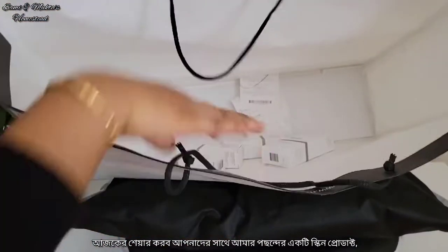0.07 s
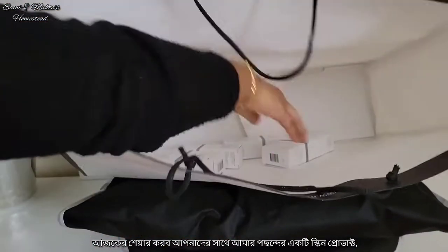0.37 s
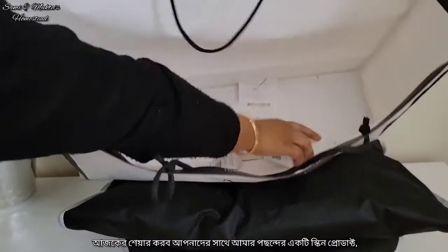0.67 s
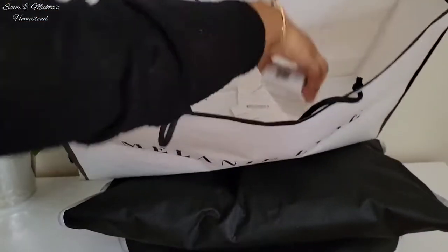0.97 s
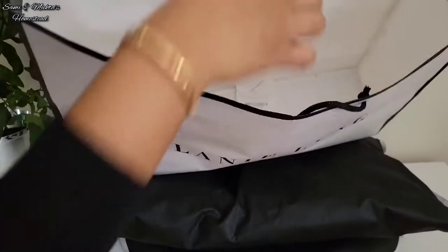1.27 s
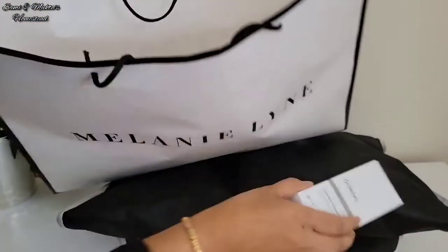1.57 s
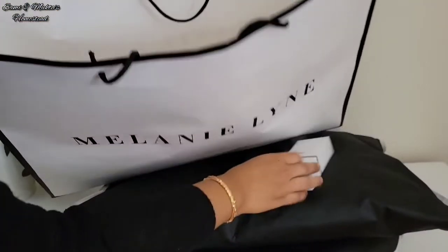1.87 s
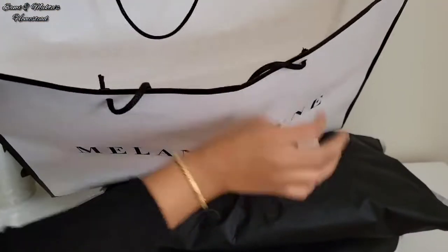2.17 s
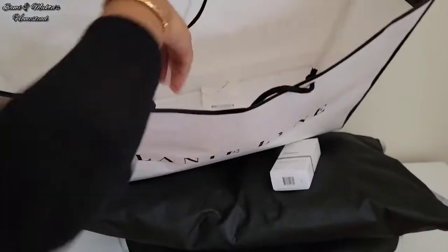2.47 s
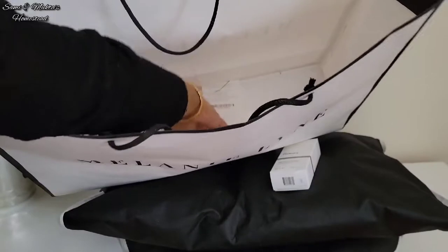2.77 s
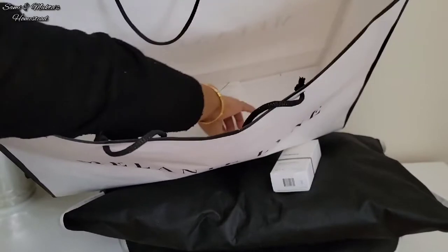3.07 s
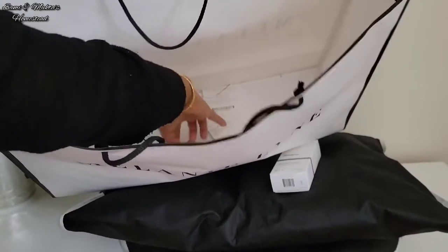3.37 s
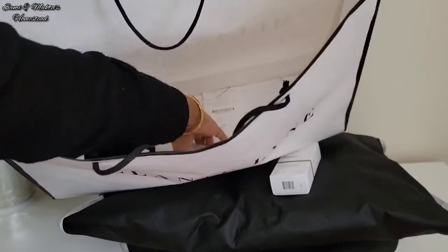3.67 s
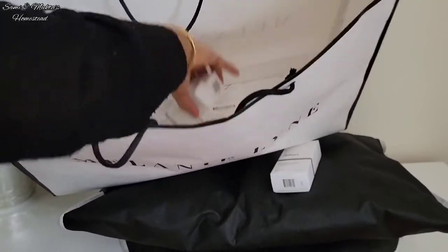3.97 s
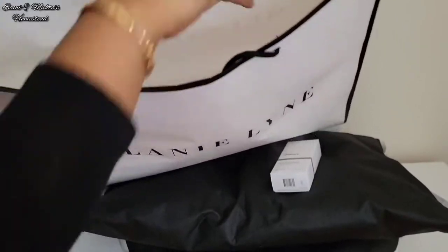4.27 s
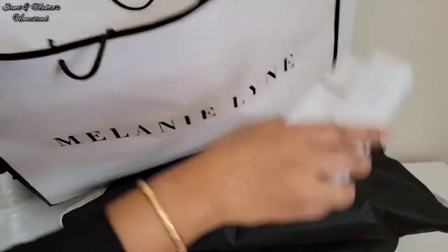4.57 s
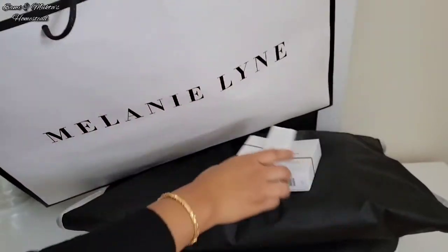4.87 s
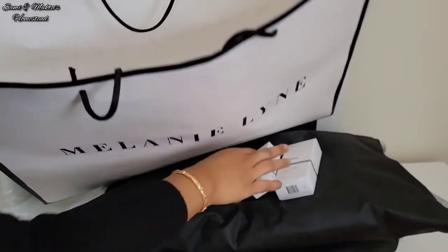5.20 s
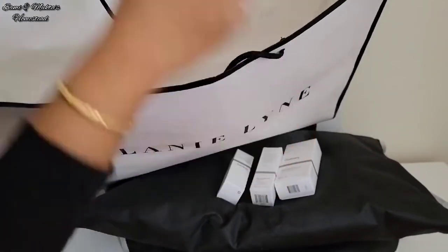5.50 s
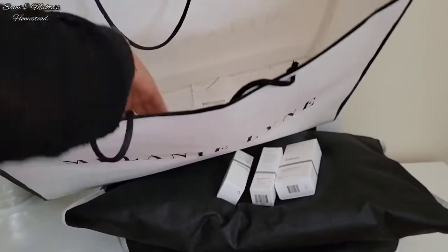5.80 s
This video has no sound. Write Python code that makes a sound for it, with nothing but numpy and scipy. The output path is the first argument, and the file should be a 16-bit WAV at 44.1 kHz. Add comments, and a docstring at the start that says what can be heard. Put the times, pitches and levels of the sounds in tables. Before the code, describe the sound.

A hand rummages in a big, stiff paper shopping bag, which crackles in short bursts while its walls flap with a soft, low boom. A sleeve rubs the rim and small cardboard boxes knock hollowly as they are gripped and set down. After a brief lull, a second, louder round of rustling and knocking follows, then thins out. It is heard close up in stereo, in a small, faintly humming room.

```python
"""A big, stiff paper shopping bag crackles as a hand reaches in twice and takes out small cardboard boxes.
The paper buckles in bursts of tiny snaps, and the boxes knock hollowly as they are bumped, gripped
and set on a cushion. The wide bag walls flap with a low boom, a sleeve rubs over the rim and a box edge
scrapes the paper. The small room hums. It is all heard close up, through a left and a right microphone."""
import sys
import numpy as np
from scipy import signal
from scipy.fft import rfft, irfft
from scipy.io import wavfile

SR = 44100
rng = np.random.default_rng(int(sys.argv[2]) if len(sys.argv) > 2 else 0)


def waveform_to_disk(signal):
    """Save audio, clipped to [-1, 1], as 16-bit WAV at the path in sys.argv[1]."""
    frames = np.transpose(np.atleast_2d(signal))
    scaled = np.clip(frames, -1, 1) * 32767
    samples = np.round(scaled).astype(np.int16)
    wavfile.write(sys.argv[1], SR, samples)


N = 261954
TIME = np.arange(N) / SR
RING_TIME = TIME[:SR // 2]
FREQS = np.maximum(np.fft.rfftfreq(N, 1 / SR), 1)

# the paper buckles: t/s, swell/s, fade/s, ring f/Hz, level/dB, sharpness/dB
BUCKLES = [(0.032, 0.004, 0.0053, 870, -50.5, -5.5), (0.430, 0.0013, 0.0056, 750, -51, 0),
           (0.493, 0.01, .012, 1070, -45.5, -10), (0.885, 0.014, .010, 990, -45, 4),
           (0.919, 0.002, 0.022, 710, -48.5, -4), (1.508, 0, 0.031, 570, -48, -1),
           (1.538, 0, 0.0049, 816, -41, -3.5), (1.875, 0, .004, 1600, -57.5, -12),
           (1.907, 0, .002, 1340, -52, -8), (1.954, 0.0033, 0.016, 556, -58, -3.5),
           (2.599, 0, 0.014, 443, -42, -3.5), (2.605, 0.0041, 0.0075, 1135, -43.5, 1.5),
           (2.841, 0.00041, 0.0034, 654, -48.5, 5.5), (2.863, 0.0006, 0.014, 595, -42, 2.5),
           (3.014, .012, 0.013, 1140, -39, 0.5), (3.270, 0, 0.0095, 874, -35, -4),
           (3.278, 0.0023, 0.016, 387, -45.5, 6.5), (3.316, 0.0002, .008, 1240, -41.5, 4.5),
           (3.337, 0, 0.009, 1346, -33.5, -16), (3.388, .003, 0.011, 540, -43, 5),
           (3.409, 0.003, 0.0092, 1250, -37.5, 2.5), (3.646, 0.0013, .009, 1630, -59.5, 7.5),
           (3.684, 0.00017, .005, 1300, -41.5, 1), (3.812, 0.001, .005, 1130, -46, -6),
           (3.887, 0, 0.0022, 1160, -58, 1), (4.093, 0.0021, 0.0033, 1230, -37, -5),
           (4.100, 0.0016, 0.006, 1170, -32, -2), (4.113, 0.023, 0.0075, 1280, -38, -3),
           (4.278, 0.001, 0.0081, 920, -52.5, 1.5), (4.561, 0, 0.013, 560, -47.5, -1),
           (4.589, 0.0041, 0.0077, 492, -39, 1), (5.029, .007, .008, 920, -53, 0.5),
           (5.071, 0.0015, 0.011, 1017, -43.5, -1.5), (5.359, 0.00077, 0.0011, 1220, -50, -0.5)]
# a box is bumped, gripped or set down: t/s, swell/s, fade/s, ring f/Hz, level/dB, sharpness/dB
BOX_KNOCKS = [(0.09, 0.0026, .004, 382, -55.5, -5), (0.521, 0.0016, 0.0079, 1008, -35, -17),
              (1.091, 0.0073, 0.02, 624, -43.5, 1), (1.184, 0, 0.018, 434, -47, -6),
              (1.412, 0.01, 0.0072, 1000, -47, -9), (1.436, 0.012, 0.0032, 1090, -50.5, -6),
              (1.598, 0.0011, .005, 704, -44.5, -1), (1.626, 0.0023, 0.0096, 560, -41.5, -11),
              (1.654, 0.0016, 0.0069, 590, -35.5, 7), (2.269, 0.00074, 0.0061, 400, -49, -12),
              (3.578, 0, 0.013, 530, -48, -17), (3.684, 0.00051, 0.007, 1096, -32.5, 24),
              (3.714, .006, 0.013, 670, -44.5, 24.5), (4.307, 0, .008, 520, -36.5, 8.5),
              (4.503, 0.0026, .0056, 573, -44.5, 13.5), (4.568, 0.002, 0.015, 495, -37, -3),
              (4.657, 0, 0.0062, 560, -42, -5), (4.801, 0, 0.014, 660, -46.5, -15),
              (5.084, 0, 0.0015, 1010, -39.5, 3), (5.169, 0.0042, 0.0039, 574, -46.5, -7)]
# a bag wall is pushed: t/s, level/dB
WALL_PUSHES = [(0.043, -31), (0.441, -23), (0.479, -32), (0.930, -30), (1.526, -16.5), (1.633, -17.5),
               (1.753, -33.5), (2.611, -15.5), (2.876, -14.5), (2.917, -29), (3.034, -20), (3.282, -12),
               (3.421, -16.5), (4.107, -12.5), (4.603, -13.5)]
# the sleeve or a box slides over the paper: t/s, length/s, level/dB, brightness/dB
RUB_STROKES = [(-0.04, .17, -56, 4), (0.173, 0.2, -65, 2.5), (0.401, 0.14, -49.5, 1),
               (0.56, 0.11, -55, 1.5), (0.69, 0.44, -63.5, 6), (0.865, 0.052, -47.5, -1.5),
               (0.995, 0.1, -61, 1.5), (1.134, 0.27, -66.5, 2), (1.286, 0.2, -53.5, 5),
               (1.486, 0.087, -47.5, 5.5), (1.554, .08, -50, -0.5), (1.684, 0.053, -49.5, 5.5),
               (1.788, 0.16, -58, 5.5), (2.265, 0.22, -73.5, 1), (2.502, 0.1, -57.5, 2),
               (2.67, 0.31, -60.5, 3), (2.932, 0.1, -45, 4), (3.151, 0.1, -57, -0.5),
               (3.336, 0.11, -46, -5), (3.517, 0.35, -61, 1), (3.787, .27, -58.5, 3.5),
               (4.078, 0.02, -50, -2), (4.244, 0.082, -53.5, -1.5), (4.36, 0.39, -57.5, 0),
               (4.572, 0.054, -46.5, 2.5), (5.026, 0.12, -55, 2.5), (5.146, 0.22, -63.5, 1),
               (5.553, 0.17, -74.5, 3), (5.813, 0.16, -61.5, 2)]
# a box edge scrapes the paper: t/s, length/s, ring f/Hz, level/dB
EDGE_SCRAPES = [(0.58, 0.047, 3100, -50), (1.702, 0.028, 2520, -48.5)]
# four pitch bands, called body, middle, crack and top: low f/Hz, high f/Hz
BANDS = [(120, 500), (500, 1700), (1700, 5000), (5000, 16500)]
# how a hit is shared among those bands (boxes have no top): level/dB
PAPER_BANDS_DB = [1.5, -1, -2, -14]
BOX_BANDS_DB = [-9.5, -0.5, -24]
# the tone colour of each source, from bass to treble: f/Hz, level/dB
PAPER_COLOUR = [(120, 8), (200, -3.5), (300, -6), (480, -10.5), (760, -4), (1210, -5.5), (1850, -18),
                (3490, -21), (5790, -31), (7500, -27.5), (9500, -40.5), (13500, -39), (16000, -44)]
BOX_COLOUR = [(120, -44.5), (250, 15), (400, 6), (700, 0.5), (1000, -1), (1400, -9), (1900, -13.5),
              (3000, -15), (6000, -43)]
SLEEVE_COLOUR = [(250, 17.5), (460, 1.5), (700, -5), (1040, -3), (1550, -7.5), (1900, -2.5), (3280, 2),
                 (5070, -16.5), (7400, -18), (9500, -23.5), (12500, -24.5), (16000, -27)]
AIR_COLOUR = [(20, -5), (40, -7.5), (60, 6.5), (100, -10.5), (150, -3), (230, -13.5), (330, -19.5),
              (460, -20), (700, -24.5), (1200, -45.5), (2000, -45.5), (4000, -38.5), (7000, -48),
              (10000, -82), (16000, -49)]
# pitches at which the bag and the boxes like to ring: f/Hz, width/Hz, boost/dB
BAG_RINGS = [(297, 32, 3), (570, 18, 5), (1178, 19, 8), (1300, 13, 1), (2160, 47, 1.5), (2492, 51, 5.5),
             (2763, 58, 6.5), (3480, 58, 2.5), (4300, 76, 1)]
BOX_RINGS = [(357, 29, 7.8), (544, 17, 3.9), (722, 41, 8.8), (1010, 49, 2.9), (1220, 260, 4.4),
             (1500, 190, 1.1)]
# low notes of the bag walls and the air between them: f/Hz, level/dB, time to fade by 60 dB/s
WALL_NOTES = [(51.2, 5, 0.28), (71.1, -8.5, 0.29), (96, -15, 0.54), (127.4, -7, 0.23)]
# the tones of the room's hum: f/Hz, wander/Hz, level/dB
HUM_TONES = [(55, 3.39, -47), (139.8, 5.45, -57.5), (198.3, 6.8, -61), (298, 8.6, -73), (463, 9.35, -67)]
# stereo width, the part where left and right differ against the part they share: f/Hz, level/dB
STEREO_WIDTH = [(60, -7.5), (190, -14.5), (380, -0.5), (700, 2), (1290, 3), (2380, 0.5), (5000, 0),
                (6500, 2), (15000, -92)]


def paper_crackle():
    """Stiff paper gives way in quick snaps that make the bag ring."""
    return hits(BUCKLES, colour(PAPER_COLOUR, BAG_RINGS), PAPER_BANDS_DB,
                fade_s=0.058, room_db=-9.5, snaps_per_s=700, ring_db=-4.0, ring_width_hz=55)


def box_knocks():
    """Small bumps make the hollow cardboard boxes ring."""
    return hits(BOX_KNOCKS, colour(BOX_COLOUR, BOX_RINGS), BOX_BANDS_DB,
                fade_s=0.054, room_db=-12, snaps_per_s=350, ring_db=-2.5, ring_width_hz=35)


def hits(table, tone, bands_db, fade_s, room_db, snaps_per_s, ring_db, ring_width_hz):
    """Each burst of snaps makes a sheet ring briefly at many pitches; the room carries the sound on."""
    out, noise = np.zeros((2, N + SR)), stereo_noise(tone)
    size = len(RING_TIME)
    decay = np.hypot(die_away(fade_s), from_db(room_db) * die_away(fade_s=0.32))
    for start, swell, fade, hz, level, sharpness in table:
        spot = rng.integers(N - size)   # every spot on the sheet rings differently
        at = max(round(start * SR), 0)
        clicks = snaps(swell, fade, snaps_per_s)
        sheet = signal.fftconvolve(noise[:, spot:spot + size] * decay, clicks[None])[:, :size]
        ring = resonance(np.pad(clicks, (0, size - len(clicks))), hz, ring_width_hz)
        ring = left_and_right(ring, lag_s=0.00021) / strength(ring[None])
        sound = sheet / strength(band(sheet, *BANDS[1])) + from_db(ring_db) * ring
        body_db = 11.5 * np.log2(807 / hz)   # a larger patch rings lower and has more body
        for (low, high), db, boost in zip(BANDS, bands_db, [body_db, 0, sharpness, sharpness]):
            part = band(sound, low, high, order=4)
            opening = part[:, :SR // 33]   # the first 30 ms set the level
            out[:, at:at + size] += part * from_db(level + db + boost) / strength(opening)
    return out[:, :N]


def snaps(swell, fade, per_s, spread_db=5.0):
    """Uneven little snaps build up to a main one and die away."""
    t = TIME[:SR // 11]
    sizes = from_db(spread_db * rng.standard_normal(len(t))) * rng.choice([-1, 1], len(t))
    rise = np.minimum((t + 1 / SR) / (swell + 1 / SR), 1)
    fall = np.exp(-np.maximum(t - swell, 0) / (2 * fade))
    clicks = sizes * (rng.random(len(t)) < per_s / SR) * rise * fall
    clicks[round(swell * SR)] = 1.54   # the main snap
    return clicks


def wall_boom(push_s=0.013):
    """A soft push sets the bag's wall and the air behind it swinging."""
    push, boom = np.zeros(N), 0
    for start, db in WALL_PUSHES:
        pulse = np.cos(np.pi * np.clip((TIME - start) / push_s, -.5, .5)) ** 2
        push += from_db(db) * pulse / pulse.sum()
    for hz, db, fade_s in WALL_NOTES:
        note = from_db(db) * die_away(fade_s) * np.cos(2 * np.pi * hz * RING_TIME)
        boom = boom + signal.fftconvolve(push, note)[:N]
    open_top = signal.butter(2, 24, "high", fs=SR, output="sos")   # slow air just leaves the bag
    return left_and_right(signal.sosfilt(open_top, boom), lag_s=0.00082)


def sleeve_rub(drag_db, rasp_db, hiss_db):
    """The sleeve rubs the bag and makes it ring: a low drag, a higher rasp and a hiss on top."""
    rub = stereo_noise(colour(SLEEVE_COLOUR, BAG_RINGS))
    rub *= friction(per_s=170, spread_db=2.5, grain_s=0.0014, even_share=0.82)
    out, pressure_db = 0, drift(per_s=20)
    layers = [((400, 1700), -1, drag_db), (BANDS[2], 0, rasp_db), (BANDS[3], 1, hiss_db)]
    for (low, high), treble, db in layers:
        part = band(rub, low, high)
        gain = from_db(db + pressure_db + 0.25 * drift(per_s=60))
        out = out + part / strength(part) * rub_loudness(treble) * gain
    return out


def rub_loudness(treble):
    """Strokes and settling paper add up; treble is -1 for the drag, 0 for the rasp, 1 for the hiss."""
    dull_db = -4.5 * treble
    power = from_db(-75 + dull_db) ** 2   # the sleeve never lies quite still
    for start, length, db, brightness in RUB_STROKES:
        stroke = rise_hold_fade(start, length, rise_s=0.027, fade_s=0.038)
        power = power + (from_db(db + treble * brightness) * stroke) ** 2
    for start, swell, fade, _, db, _ in BUCKLES:   # buckled paper rustles as it relaxes
        settle = rise_hold_fade(start, swell + fade, rise_s=swell + fade, fade_s=0.051)
        power = power + (from_db(db - 15.5 + dull_db) * settle) ** 2
    return np.sqrt(power)


def friction(per_s, spread_db, grain_s, even_share):
    """Fibres catch and let go, adding short, uneven grains to a smooth rub."""
    moments = rng.random(N) < per_s / SR
    catches = moments * from_db(spread_db * np.minimum(rng.exponential(1, N), 4)) ** 2
    power = signal.lfilter([1], [1, -np.exp(-1 / (grain_s * SR))], catches + 1e-18)
    return np.sqrt(even_share + (1 - even_share) * power / power.mean())


def edge_scrape():
    """A box edge sticks and slips quickly on the paper, ringing around one pitch."""
    out, slips = 0, stereo_noise(np.ones(len(FREQS)))
    slips *= friction(per_s=400, spread_db=1.0, grain_s=0.002, even_share=0.34)
    for start, length, hz, db in EDGE_SCRAPES:
        ring = resonance(slips, hz, width_hz=470)
        shape = rise_hold_fade(start, length, rise_s=0.028, fade_s=0.037)
        out = out + ring / strength(ring) * from_db(db) * shape
    return out


def room_hum():
    """Low tones waver over a soft, dull noise of air."""
    hum = 0
    for hz, wander, db in HUM_TONES:
        phase = 2 * np.pi * np.cumsum(hz + wander * drift(per_s=13.67)) / SR
        hum = hum + np.sqrt(2) * from_db(db + 0.62 * drift(per_s=3.7)) * np.sin(phase)
    return hum + from_db(-51) * stereo_noise(from_db(curve(AIR_COLOUR)))


def from_db(db):
    """Turns decibels into a number to multiply by."""
    return 10 ** (np.asarray(db) / 20)


def strength(x):
    """The average size (rms) of what left and right share."""
    return np.sqrt(np.mean(x.mean(0) ** 2) + 1e-20)


def curve(points):
    """Joins (f/Hz, level/dB) points into a level for every frequency."""
    hz, db = np.transpose(points)
    return np.interp(np.log(FREQS), np.log(hz), db)


def colour(points, rings):
    """A broad tone colour with a peak at each ringing pitch."""
    peaks_db = sum(db / (1 + (2 * (FREQS - hz) / width) ** 2) for hz, width, db in rings)
    return from_db(curve(points) + peaks_db)


def band(x, low, high, order=3):
    """Keeps the sound between a low and a high frequency."""
    return signal.sosfilt(signal.butter(order, [low, high], "band", fs=SR, output="sos"), x + 1e-18)


def resonance(x, hz, width_hz):
    """Makes a sound ring at one pitch; a smaller width rings longer."""
    r = np.exp(-np.pi * width_hz / SR)
    feedback = [1, -2 * r * np.cos(2 * np.pi * hz / SR), r * r]
    return signal.lfilter(np.array([1, 0, -1]) * (1 - r * r) / 2, feedback, x + 1e-18)


def stereo_noise(tone):
    """Noise of the given tone colour, spread between left and right."""
    spectra = rfft(rng.standard_normal((2, N))) * tone
    spectra[1] *= from_db(curve(STEREO_WIDTH))
    shared, side = irfft(spectra, N)
    pair = np.array([shared + side, shared - side])
    return pair / strength(pair)


def left_and_right(x, lag_s):
    """The sound reaches the right microphone a little after the left."""
    t = TIME[:len(x)]
    return np.array([x, np.interp(t - lag_s, t, x)])


def die_away(fade_s):
    """A fade that loses 60 dB in fade_s seconds."""
    return from_db(-60 * RING_TIME / fade_s)


def rise_hold_fade(start, length, rise_s, fade_s):
    """Rises smoothly, holds until start + length, then fades."""
    rise = .5 + .5 * np.tanh((TIME - start) / rise_s - .5)
    return rise * np.exp(-np.maximum(TIME - start - length, 0) / fade_s)


def drift(per_s):
    """A smooth random wobble with a typical size of 1."""
    slow = irfft(rfft(rng.standard_normal(N)) / (1 + (FREQS / per_s) ** 4), N)
    return slow / slow.std()


def scene():
    """Adds up the bag, boxes, sleeve and room; the boom and the hum are a little louder on the right."""
    handling = paper_crackle() + box_knocks()
    boom = wall_boom() * from_db([[-1.2], [1.1]])
    rub = sleeve_rub(drag_db=3.5, rasp_db=0.58, hiss_db=-6)
    return handling + boom + rub + edge_scrape() + room_hum() * from_db([[-.6], [.6]])


def record(dry):
    """Steeply cuts the highest treble, above 15900 Hz."""
    return signal.sosfilt(signal.ellip(10, .1, 80, 15900, fs=SR, output="sos"), dry)


dry = scene()
out = record(dry)
waveform_to_disk(out)
```